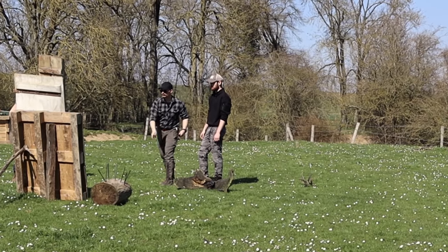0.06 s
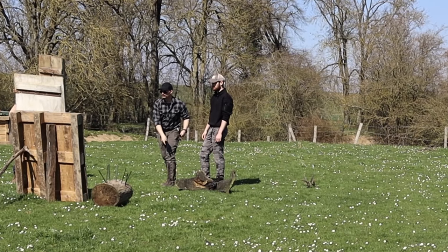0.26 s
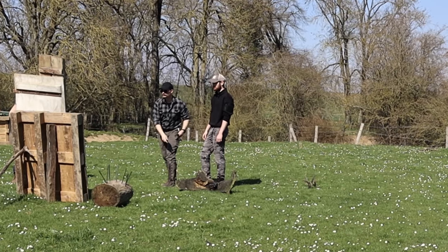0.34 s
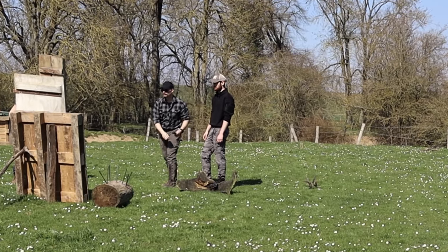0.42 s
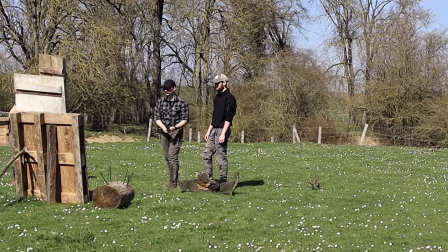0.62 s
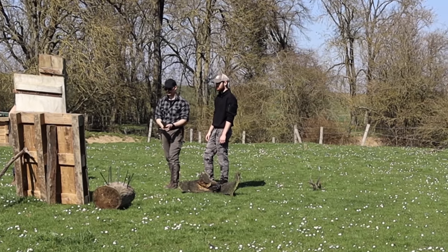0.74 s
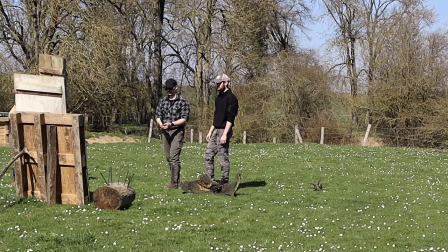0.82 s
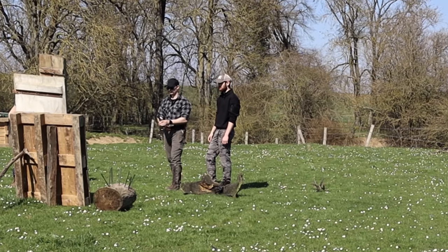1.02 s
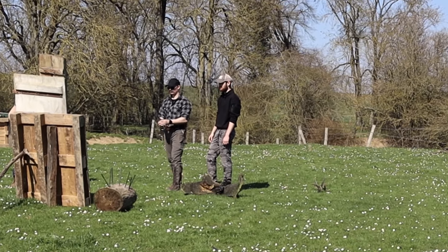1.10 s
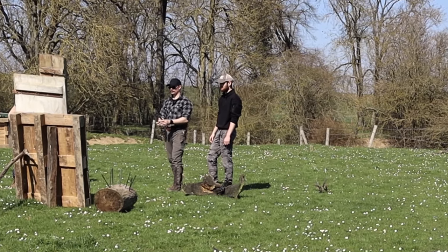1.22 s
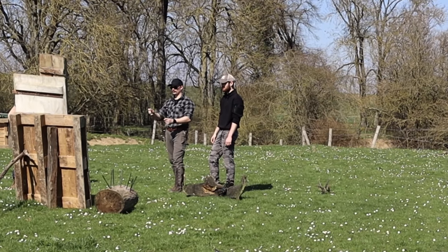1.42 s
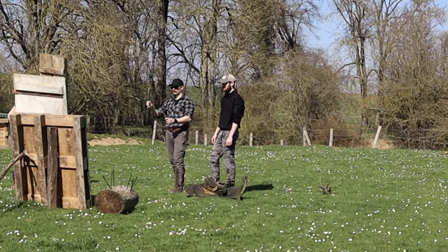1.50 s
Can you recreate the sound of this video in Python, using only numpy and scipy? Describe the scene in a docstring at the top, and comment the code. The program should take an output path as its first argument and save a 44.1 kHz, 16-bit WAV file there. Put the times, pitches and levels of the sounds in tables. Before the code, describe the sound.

A thrown knife swishes briefly and hits a wooden pallet with a loud, close thud. The boards rattle and a dull echo fades across the open field. Then spare steel knives clink faintly in a hand.

```python
"""Knife thrown into a pallet

On an open meadow a sleeve rustles and a thrown knife swishes into a wooden pallet, close enough
to overload the recorder. The blade's pushes ring the modes of the boards, which boom and rattle,
and the tree line throws the knock back. Then the spare steel knives slide and clink in the
thrower's hand, their ring damped by the grip."""
import sys
import numpy as np
from scipy import signal
from scipy.io import wavfile
from scipy.ndimage import uniform_filter1d

SR = 44100
rng = np.random.default_rng(int(sys.argv[2]) if len(sys.argv) > 2 else 0)


def dump(signal):
    """Clip the signal to [-1, 1] and save it as 16-bit WAV at the path in sys.argv[1]."""
    limited = np.clip(np.atleast_2d(signal).T, -1, 1)
    pcm = np.round(limited * 32767).astype(np.int16)
    wavfile.write(sys.argv[1], SR, pcm)


N = 68355
TIME_S = np.arange(N) / SR
BIN_HZ = np.fft.rfftfreq(512, 1 / SR)


def amp(db):
    return 10 ** (np.asarray(db) / 20)


def per_bin(points):
    """(freq_hz, value) points interpolated over log frequency, one row per bin."""
    hz, value = np.transpose(points)
    return np.interp(np.log(BIN_HZ + 1), np.log(hz + 1), value)[:, None]


def add(mix, start_s, sound):
    part = mix[round(start_s * SR):][:len(sound)]
    part += sound[:len(part)]


def to_wave(spectra):
    return signal.istft(spectra, nperseg=512, noverlap=384)[1][:N]


def noise_spectra(spectrum, patch_db, frames=10, bins=6):
    """Short-time spectra of coloured noise, rms 1, with drifting louder and softer patches."""
    real, imag, patches = rng.standard_normal((N // 128 + 5, 257, 3)).T
    patches = uniform_filter1d(patches, size=bins, axis=0)
    patches = uniform_filter1d(patches, size=frames, axis=1)
    spectra = (real + 1j * imag) * amp(per_bin(spectrum) + patch_db * patches / patches.std())
    return spectra / np.sqrt(np.mean(to_wave(spectra) ** 2))


def resonate(x, hz, width_hz):
    """A single resonance, peak gain about 1."""
    pole = np.exp((2j * hz - width_hz) * np.pi / SR)
    return 2 * signal.lfilter([1 - abs(pole)], [1, -pole], x).real


def ring(modes, length_s):
    """Decaying sines from (pitch_hz, level_db, t60_s); t60 is at least 4 ms."""
    t = np.arange(0, length_s, 1 / SR)
    return sum(amp(db - 60 * t / max(t60_s, .004)) * np.sin(2 * np.pi * hz * t)
               for hz, db, t60_s in modes)


def swell(start_s, end_s):
    """Half-sine envelope."""
    return np.sin(np.pi * np.clip((TIME_S - start_s) / (end_s - start_s), 0, 1))


# freq_hz, relative_db
AIR_SPECTRUM = [(18, -44), (30, -15.5), (108, -5), (169, -4), (203, -10), (390, -9.5), (578, -8.5),
                (641, -13.5), (694, -13), (855, -11.5), (2030, -18.5), (2250, -20.5), (2850, -21.5),
                (5070, -30), (15600, -32.5)]


def meadow_air():
    """Faint, steady, mostly low noise of the open air."""
    return amp(-55) * to_wave(noise_spectra(AIR_SPECTRUM, patch_db=1.5))


# start_s, end_s, level_db
SLEEVE_RUSTLES = [(0.001, 0.06, -58.5)]
# start_s, level_db, pitch_hz
THROW_THUMPS = [(.007, -45.5, 198), (0.031, -40, 157)]
# pitch_hz, start_s, end_s, level_db
THIN_TONES = [(5570, 0.049, 0.091, -63.5), (7550, 0.046, 0.052, -60.5)]


def throw():
    """The sleeve rustles and thumps softly; a thin ring follows."""
    out = np.zeros(N)
    for start_s, end_s, db in SLEEVE_RUSTLES:
        cloth = resonate(rng.standard_normal(N), hz=4000, width_hz=9000)
        out += amp(db) * cloth * swell(start_s, end_s)
    for start_s, db, hz in THROW_THUMPS:
        add(out, start_s, ring([(hz, db, .04)], length_s=.05))
    for hz, start_s, end_s, db in THIN_TONES:
        out += amp(db) * np.sin(2 * np.pi * hz * TIME_S) * np.sqrt(swell(start_s, end_s))
    return out


# freq_hz, relative_db
SWISH_SPECTRUM = [(120, -14), (200, -6), (1130, -1), (1540, -4.5), (2710, -6), (3840, -19), (4860, -15.5),
                  (15600, -44)]
# time_s, level_db
SWISH_ENVELOPE = [(0.11, -72), (0.115, -64.5), (0.136, -55.5), (0.144, -64.5), (0.192, -40.5), (0.202, -64)]
# start_s, level_db
FLIGHT_TICKS = [(.1695, -38), (.182, -35), (0.1854, -66), (0.1899, -22.5)]
# pitch_hz, relative_db, width_hz
TICK_MODES = [(700, -6.5, 870), (2780, -4, 240), (5320, -10, 2500), (10600, -31, 3000)]


def flight():
    """The knife swishes through the air, ending in small ticks."""
    times_s, levels_db = np.transpose(SWISH_ENVELOPE)
    envelope = amp(np.interp(TIME_S, times_s, levels_db, left=-120, right=-120))
    out = envelope * to_wave(noise_spectra(SWISH_SPECTRUM, patch_db=3))
    tick = ring([(hz, db, 2.5 / width_hz) for hz, db, width_hz in TICK_MODES], length_s=.02)
    for start_s, db in FLIGHT_TICKS:
        add(out, start_s, amp(db) * tick)
    return out


# start_s, level_db, centre_hz, width_hz, length_s
CRACK_AND_ECHOES = [(.2315, -29, 6900, 12000, 0.003), (0.27, -39.5, 10700, 8000, .006),
                    (0.278, -49, 11500, 4080, .005), (0.283, -45.5, 6020, 3000, 0.014),
                    (0.321, -51.5, 6000, 3500, 0.0065), (0.351, -49, 3630, 1200, 0.0048),
                    (0.353, -30, 1050, 417, 0.042), (.44, -37, 180, 122, 0.05), (0.573, -45, 131, 149, .03)]


def crack_and_echoes():
    """Noise bursts: the blade cracks, boards slap back, the trees return the knock."""
    out = np.zeros(N)
    for start_s, db, hz, width_hz, length_s in CRACK_AND_ECHOES:
        band = resonate(rng.standard_normal(N), hz, width_hz)
        band = resonate(band, hz, width_hz)  # steeper skirts
        out += amp(db) * band / band.std() * swell(start_s, start_s + length_s)
    return out


# start_s, relative_db, direction, half_length_ms
BLADE_PUSHES = [(0.2324, -6, 1, 1.59), (0.2339, 2.5, -1, 1.24), (0.2368, 1.5, 1, 1.985),
                (0.2399, 4.5, -1, 0.81), (.2440, -1, 1, .4), (.2585, -2, -1, 0.31)]
# pitch_hz, relative_db, t60_s
BOARD_MODES = [(70, -15.5, 0.55), (113.8, -11.5, 0.242), (154.1, -10, 0.091), (179.9, -23.5, 0.4),
               (254, -23.5, .3), (313.3, -14, 0.61), (322.6, -18, .35), (357.4, -14, 0.13),
               (452, -12.5, .2), (552, -9, 0.22), (739, -28, 0.37), (814, -17, 0.12), (862.4, -1.5, 0.17),
               (1032, -1.5, .13), (1264, -9.5, .22), (1320, -17.5, .13)]


def pallet(t60_max_s=.58, tip_s=.2405, tip_db=-8):
    """The blade's pushes sound directly and through the boards; its sharp tip rings the high modes."""
    push = np.zeros(N)
    for start_s, db, direction, half_length_ms in BLADE_PUSHES:
        pulse = np.hanning(round(2 * half_length_ms * SR / 1000))
        add(push, start_s, direction * amp(db) * pulse)
    modes = [(hz, db, min(t60_s, t60_max_s)) for hz, db, t60_s in BOARD_MODES]
    boards = amp(-40) * signal.fftconvolve(push, ring(modes, length_s=.8))[:N]
    high_modes = [(hz, db, t60_s) for hz, db, t60_s in BOARD_MODES if hz > 500]
    add(boards, tip_s, amp(tip_db) * ring(high_modes, length_s=.8))
    return amp(2) * push + amp(3) * boards


# freq_hz, relative_db
RATTLE_SPECTRUM = [(30, -35), (60, -10.5), (139, -13), (288, -11), (440, -7), (689, -11.5), (1030, -9.5),
                   (1500, -9), (2200, -18.5), (4160, -29.5), (15600, -50.5)]
# freq_hz, t60_s
RATTLE_DECAY = [(50, .35), (150, 0.6), (400, 0.36), (1000, .3), (2000, 0.14), (4000, .15), (8000, 0.1),
                (15000, 0.054)]


def rattle(start_s, rise_s=.006):
    """The struck boards rattle: noise that dies band by band, treble first."""
    spectra = noise_spectra(RATTLE_SPECTRUM, patch_db=2, frames=2, bins=24)
    frame_age_s = np.maximum(np.arange(spectra.shape[1]) * 128 / SR - start_s, 0)
    decay = amp(-60 * frame_age_s / per_bin(RATTLE_DECAY))
    rise = np.clip((TIME_S - start_s) / rise_s, 0, 1)
    return amp(-5.5) * rise * to_wave(spectra * decay)


# freq_hz, relative_db
WASH_SPECTRUM = [(30, -44.5), (60, -21), (170, -11), (320, -11.5), (500, -18.5), (1050, -17), (1800, -27.5),
                 (4000, -44), (15600, -73)]


def far_wash(start_s, rise_s=.026, t60_s=.74):
    """The knock comes back from afar as a dull, fading wash."""
    age_s = np.maximum(TIME_S - start_s, 0)
    envelope = np.minimum(age_s / rise_s, 1) * amp(-22.5 - 60 * age_s / t60_s)
    return envelope * to_wave(noise_spectra(WASH_SPECTRUM, patch_db=2))


# start_s, end_s, level_db
BLADE_SLIDES = [(0.52, 0.556, -56.5), (0.554, 0.604, -52)]
# pitch_hz, relative_db
SCRAPE_MODES = [(2390, 6.5), (3070, 4.5), (3900, 5), (5430, 1.5), (5950, -2), (7550, -6), (9200, -9),
                (12100, -17), (14900, -7)]


def sliding_blades():
    """Blades slide on each other: sparse grit excites narrow steel resonances."""
    grit = rng.standard_normal(N) * (rng.random(N) < .05)
    scrape = sum(amp(db) * resonate(grit, hz, width_hz=130) for hz, db in SCRAPE_MODES)
    envelope = sum(amp(db) * np.sqrt(swell(start_s, end_s)) for start_s, end_s, db in BLADE_SLIDES)
    return envelope * scrape / scrape.std()


# pitch_hz per mode; nine groups: five flat bends, higher bends, twists, two edgewise bends
KNIFE_GROUPS_HZ = [
    [1255],
    [2331],
    [3722],
    [5384],
    [7292],
    [9458, 11995, 14620],
    [2960, 5785, 8917],
    [4660, 1835],
    [8545],
]
# relative_db, t60_s per mode; same groups
KNIFE_GROUP_RING = [
    [(-3, 0.15)],
    [(0, 0.22)],
    [(0.5, .11)],
    [(-0.5, 0.12)],
    [(0, 0.12)],
    [(2.5, 0.14), (4, 0.18), (-6, .07)],
    [(2, .14), (0, 0.037), (-6.5, 0.031)],
    [(0, 0.24), (-8.5, .12)],
    [(0, 0.34)],
]
# start_s, t60_share, pitch_rise_percent, tick_db, then group_db for each of the nine groups
KNIFE_CLINKS = [(0.5288, 0.37, 2.4, -46, -70, -52, -49.5, -66, -66, -80, -62, -66, -85),
                (0.5657, 0.53, 3., -58, -61, -72, -53, -66, -68, -79, -75, -76, -92),
                (0.5993, 1, 0.06, -41.5, -72, -47.5, -47, -52, -60, -66, -46, -62, -87),
                (0.6531, 0.82, 0.58, -42.5, -46, -55, -47.5, -76, -78, -88, -52, -61, -86),
                (0.7395, 0.94, 0.84, -42, -60, -53.5, -42, -54.5, -68, -84, -57, -57, -88),
                (0.7645, 0.39, 0.56, -39, -78.5, -50, -38.5, -66, -58, -80, -53, -71, -69),
                (.785, 0.9, .05, -70, -75, -54.5, -65, -73, -88, -90, -76, -87, -80),
                (.844, 0.64, 0.047, -43.5, -63, -41, -39.5, -52, -49, -63.5, -51.5, -55, -53),
                (.9627, 0.91, .01, -54, -43, -53, -35.5, -41, -45.5, -56, -47, -48, -55.5),
                (1.1624, 0.47, 0.93, -54, -71, -53, -49, -47.5, -53.5, -66, -66, -68, -69),
                (1.2027, .5, 0.067, -70, -62, -78, -57, -74, -80, -88, -66, -77, -85),
                (1.2145, 0.84, 0.059, -70, -51, -54.5, -58, -59.5, -74, -90, -68, -84, -88)]


def knife_modes(t60_share, pitch_rise_percent, groups_db):
    """Modes of a held knife: the grip shortens the ring, pressing the blade raises its pitch."""
    return [(hz * (1 + pitch_rise_percent / 100), group_db + db, t60_s * t60_share)
            for pitches_hz, group, group_db in zip(KNIFE_GROUPS_HZ, KNIFE_GROUP_RING, groups_db)
            for hz, (db, t60_s) in zip(pitches_hz, group)]


def clinks(ring_s=.3, rise_s=.0004, chatter_s=.014, touch_count=14):
    """Steel on steel: the knife rings, and a chatter of touches adds ticks and damped ringing."""
    out = np.zeros(N)
    for start_s, t60_share, pitch_rise_percent, tick_db, *groups_db in KNIFE_CLINKS:
        modes = knife_modes(t60_share, pitch_rise_percent, groups_db)
        tick = amp(tick_db) * ring([(1660, .5, .011), (3940, 1, .0047)], ring_s)
        rise = np.minimum(TIME_S[:len(tick)] / rise_s, 1)
        strike = rise * (ring(modes, ring_s) + tick)
        damped = ring([(hz, db, .21 * t60_s) for hz, db, t60_s in modes], ring_s)
        touches = np.zeros(round(chatter_s * SR) + 2)
        position, strength = rng.random(touch_count), rng.standard_normal(touch_count)
        touches[(position * len(touches)).astype(int)] = amp(-6.5 - 3 * position) * strength
        chatter = signal.fftconvolve(touches, rise * (damped + tick))[:len(tick)]
        add(out, start_s, strike + chatter)
    return out


def scene():
    """Air, impact, spare knives and the throw before them, in mono."""
    air = meadow_air()
    impact = pallet() + rattle(start_s=.233) + far_wash(start_s=.233) + crack_and_echoes()
    spare_knives = clinks() + sliding_blades()
    return (air + impact + spare_knives + flight() + throw())[None]


def record(dry, low_cut_hz=55, ceiling=.995, band_limit_hz=15750):
    """The deepest bass is cut away, the blow clips the recorder, then the band is limited."""
    low_cut = signal.butter(2, low_cut_hz, "high", fs=SR)
    clipped = np.clip(signal.lfilter(*low_cut, dry), -ceiling, ceiling)
    band_limit = signal.firwin(511, band_limit_hz, window=("kaiser", 9), fs=SR)
    return signal.oaconvolve(clipped, band_limit[None], "same")


dry = scene()
out = record(dry)
dump(out)
```